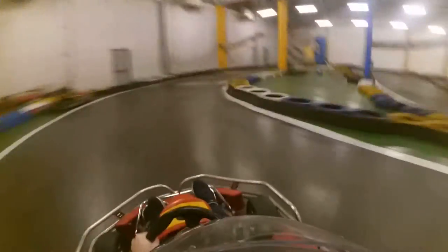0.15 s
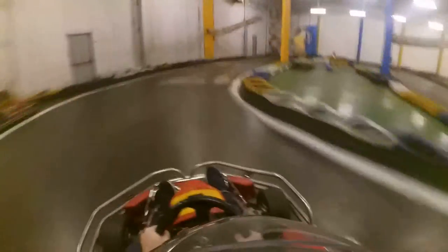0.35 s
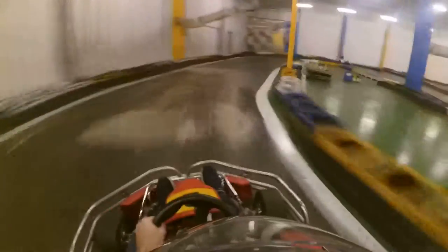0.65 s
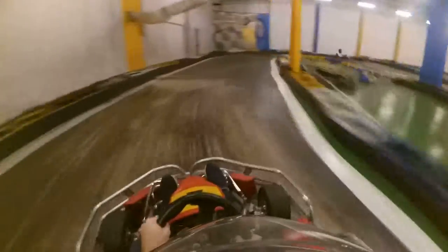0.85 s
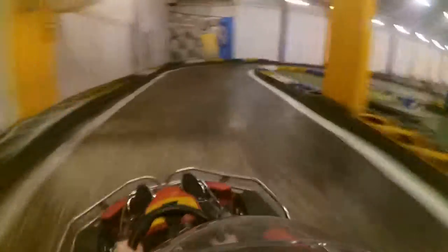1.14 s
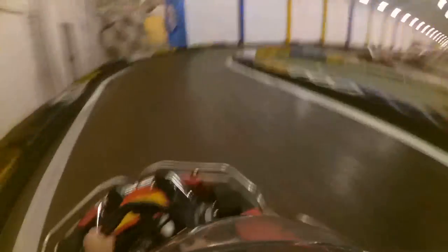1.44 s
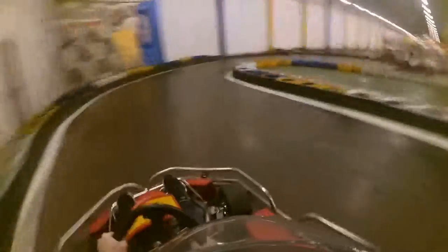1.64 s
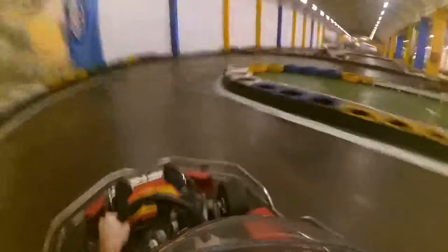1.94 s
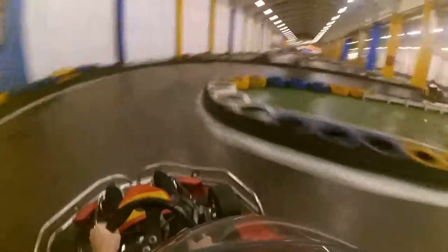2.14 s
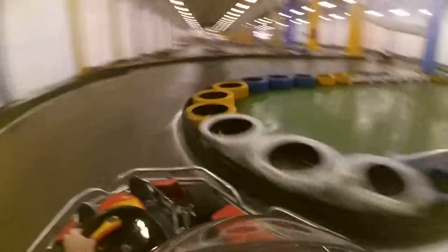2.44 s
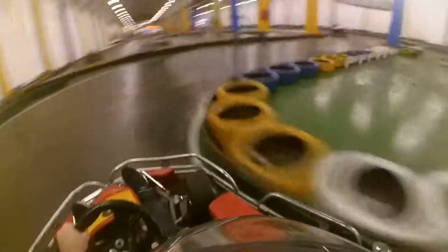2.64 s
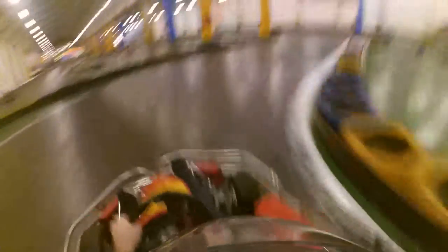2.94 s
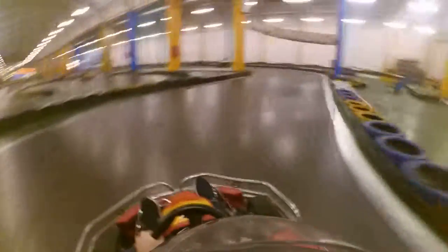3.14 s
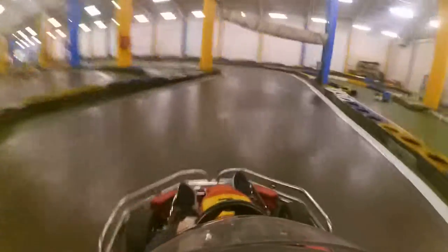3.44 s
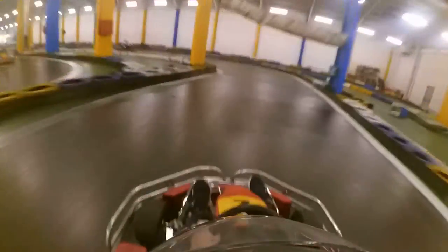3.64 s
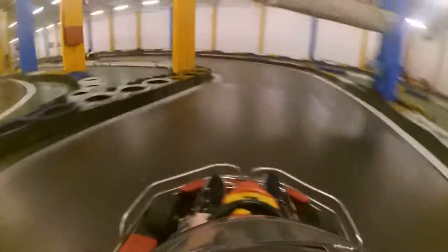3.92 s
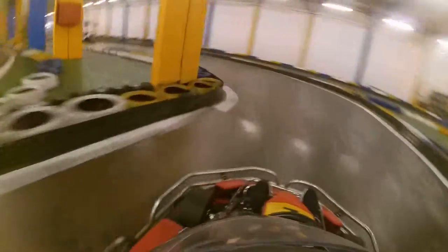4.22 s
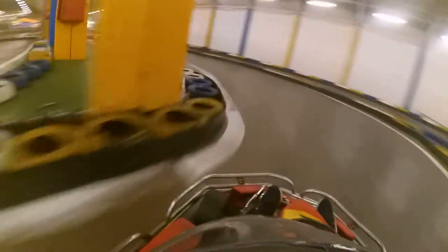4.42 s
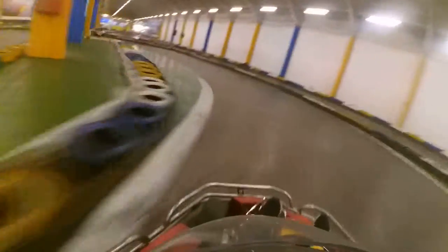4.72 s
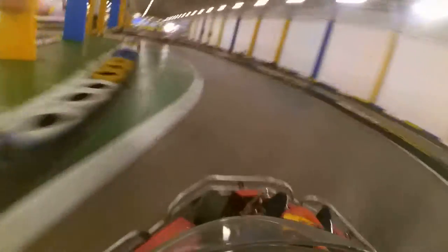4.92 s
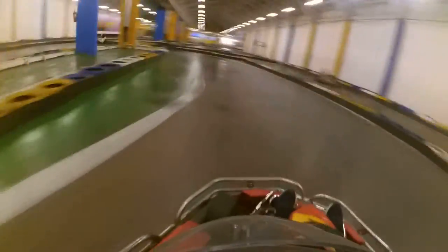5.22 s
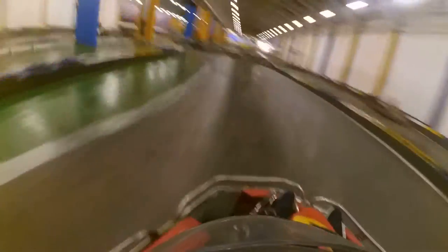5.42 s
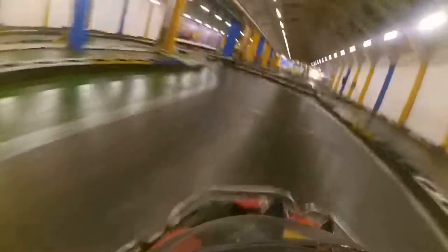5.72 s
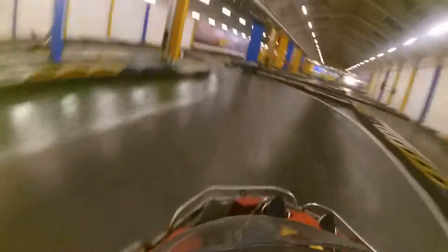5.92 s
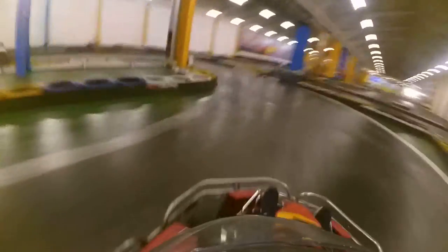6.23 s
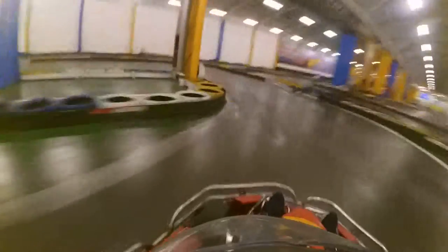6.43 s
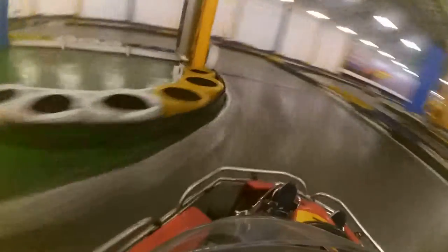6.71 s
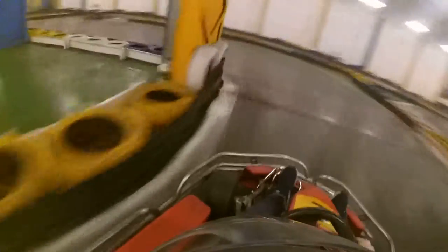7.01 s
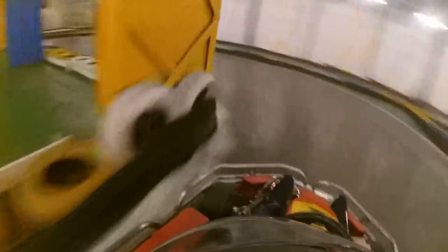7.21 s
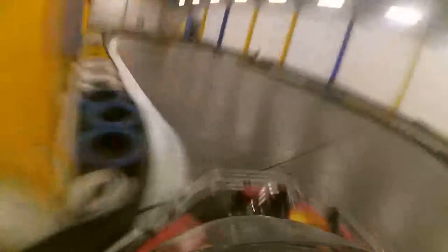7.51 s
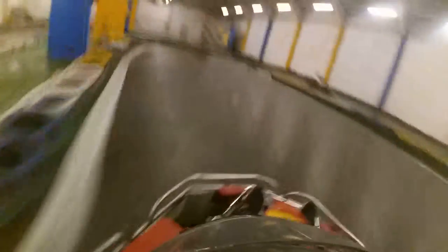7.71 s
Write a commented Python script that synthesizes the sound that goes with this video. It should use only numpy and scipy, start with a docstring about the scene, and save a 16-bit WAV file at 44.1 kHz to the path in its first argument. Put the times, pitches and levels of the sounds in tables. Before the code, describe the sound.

From the helmet of a driver lapping an indoor track, a small go-kart engine pulses with a sharp crackle and metallic clatter. The revs sink into a corner with knocks and short, hoarse tyre squeals, then build gradually with a fluttering chain whine. They fall again for another chirping bend before a last hard burst of throttle. Low wind rumble and soft helmet thuds run underneath.

```python
"""A throbbing, crackling engine pulls hard: a one-cylinder four-stroke go-kart laps an indoor track.
Heard from the driver's helmet, the exhaust pulses and the engine and chain set the metalwork ringing.
With the pedal down, every firing adds a sharp crack. The shaking helmet rumbles in the rushing air,
the frame knocks over bumps, and the tyres scrub and chirp in the tight corners."""
import sys
import numpy as np
from scipy import signal
from scipy.fft import rfft, irfft
from scipy.io import wavfile

SR = 44100
rng = np.random.default_rng(int(sys.argv[2]) if len(sys.argv) > 2 else 0)


def transcribe(u):
    """Save the signal u as a 16-bit wav file named by the first command-line argument.

    u: samples, shape (n,) or (channels, n), limited to [-1, 1]; the rate is SR.
    q: integer samples, one column per channel.
    """
    v = np.clip(np.atleast_2d(u).T, -1, 1)
    q = np.round(v * 32767).astype(np.int16)
    wavfile.write(sys.argv[1], SR, q)


N = 346626
TIME = np.arange(N) / SR
FREQS = np.maximum(np.fft.rfftfreq(N, 1 / SR), .01)


def undb(db):
    """Turn decibels into a gain."""
    return 10 ** (np.asarray(db) / 20)

def level(x, db=0):
    """Scale a signal to an average (rms) level."""
    return x * undb(db) / np.std(x)

def noise():
    """White noise: an even hiss."""
    return rng.standard_normal(N)

def wander(rate):
    """A random drift that heads for a new value rate times a second."""
    count = int(rate * N / SR) + 2
    return level(np.interp(TIME * rate, np.arange(count), rng.standard_normal(8192)[:count]))

def colour(x, points):
    """Give a sound the tone of a (frequency [Hz], level [dB]) table, at an rms level of one."""
    hz, db = np.transpose(points)
    cepstrum = irfft(np.log(undb(np.interp(np.log(FREQS), np.log(hz), db))), N)
    fold = 1 + np.sign(N / 2 - np.arange(N)) * (np.arange(N) > 0)  # ring after a hit, never before
    return level(irfft(rfft(x) * np.exp(rfft(cepstrum * fold)), N))

def ring(strike, tones):
    """Ring each tone of an object with its own signal from strike()."""
    spectrum = 0
    for hz, width, db in tones:
        off_pitch = hz / width * (FREQS / hz - hz / FREQS) / 1.294
        spectrum += undb(db) * rfft(strike()) / (1 + 1j * off_pitch) ** 2
    return level(irfft(spectrum, N))

def grains(spread_db):
    """Tightly packed tiny hits of uneven size."""
    return level(noise() * undb(spread_db * np.minimum(rng.exponential(size=N), 6)))

def taps(rate):
    """Lone hits at random moments, about rate a second."""
    return level((rng.random(N) < rate / SR) * (1 + .5 * rng.exponential(size=N)))

def burst(age, rise_s, decay_s):
    """The shape of a blow: it rises, then dies away."""
    age = np.maximum(age, 0)
    return (1 - np.exp(-age / rise_s)) * np.exp(-age / decay_s)

def hump(s, half_s):
    """A smooth swell around a moment."""
    return np.exp(-((TIME - s) / half_s) ** 2)

def per_firing(cycle, spread_db):
    """A random gain held for each engine cycle."""
    return undb(spread_db * rng.standard_normal(512)[cycle.astype(int)])

def by_speed(firing_hz, cruise_db, octave_db):
    """A level in dB: cruise_db at 24 firings a second, plus octave_db for each doubling."""
    return cruise_db + octave_db * np.log2(firing_hz / 24)


# how fast the engine runs (time [s], firing rate [Hz])
ENGINE_SPEED = [(0, 34.6), (.45, 34.35), (.9, 35.03), (1.5, 28.03), (2, 25.05), (2.45, 22.86),
                (2.95, 24.22), (3.5, 23.78), (4.7, 25.3), (5.2, 26.41), (5.9, 28.67), (6.8, 24.46),
                (7.3, 20.51), (7.55, 21.43), (7.86, 25.63)]

def firings():
    """The firing rate, a running count of engine cycles, and the seconds since the last firing."""
    firing_hz = np.interp(TIME, *np.transpose(ENGINE_SPEED))
    cycle = .37 + np.cumsum(firing_hz) / SR
    return firing_hz, cycle, cycle % 1 / firing_hz

# pushes on the pedal, which add up (start [s], end [s], rise [s], firing force [dB])
PEDAL_PRESSES = [(-.5, 0.938, .05, -10), (2.68, 5.907, 0.033, -10.5), (4.117, 5.903, .3, -8.5),
                 (7.374, 7.9, 0.036, -3.5)]

def pedal():
    """The force of the firings in dB, and the load (0-1) that follows as the chain pulls tight."""
    release_s, lag_s, pedal_up_db, tight_db = 0.029, 0.11, -50, -8
    force = 0
    for start, end, rise, db in PEDAL_PRESSES:
        press = 1 - np.exp(-np.maximum(TIME - start, 0) / rise)
        force += undb(db) * press * np.exp(-np.maximum(TIME - end, 0) / release_s)
    pull = np.tanh(force / undb(tight_db))
    keep = np.exp(-1 / (lag_s * SR))
    load, _ = signal.lfilter([1 - keep], [1, -keep], pull, zi=pull[:1])
    return 20 * np.log10(force + undb(pedal_up_db)), load

# bends (middle [s], half length [s], tyre scrub [dB], frame judder [dB], extra cover shake [dB])
CORNERS = [(.5, 1, -30, -54, 1.5), (2.015, 0.52, -24.5, -41.5, 6.5), (3.067, 0.69, -29.5, -33.5, 4.5),
           (7.7, 0.59, -23, -41, 2.5)]

def cornering():
    """Sideways force swells and fades in each bend, working the tyres, frame and covers."""
    scrub = judder = shake_db = 0
    for middle, half, scrub_db, judder_db, covers_db in CORNERS:
        force = hump(middle, half)
        scrub += force * undb(scrub_db)
        judder += force * undb(judder_db)
        shake_db += force * covers_db
    return scrub, judder, shake_db

# the silencer's throb, loudest where it resonates (crank rate [Hz], level without load [dB])
SILENCER = [(42, -53), (49, -43), (52, -36), (55, -33), (58, -35.5), (70, -40.5)]
# tone of the exhaust pipe (frequency [Hz], relative level [dB])
PIPE_TONE = [(65, 10), (82, 8), (100, -3.5), (130, 2), (170, 5), (215, -0.5), (270, -6), (315, 4), (342, 5),
             (370, -4), (450, -10.5)]

def exhaust(cycle, firing_hz, throttle_db, load):
    """Gas throbs with each crank turn; overtones swell as they pass the pipe's own pitches."""
    phase = 2 * np.pi * cycle  # the crank turns twice per firing
    throb_db = np.interp(2 * firing_hz, *np.transpose(SILENCER)) + 10 * load
    throb = undb(throb_db + 1.3 * wander(11)) * np.cos(2 * phase)
    throb += undb(throttle_db - 35) * np.cos(phase)
    hz, db = np.transpose(PIPE_TONE)
    overtones = 0
    for k in range(3, 18):
        gain = undb(np.interp(np.log(k * firing_hz), np.log(hz), db) + 2 * wander(8))
        smear = k * k + 0.94 * wander(20)  # echoes in the pipe blur the pulses
        overtones += gain * np.cos(k * phase + smear)
    gas_flow = undb(by_speed(firing_hz, cruise_db=0, octave_db=10) + 7.3 * load)
    return np.sqrt(2) * throb + level(overtones * gas_flow, -38)

# ringing of the cylinder head (pitch [Hz], fade time [s], relative level [dB])
HEAD_TONES = [(3370, .0035, -3.5), (5576, 0.0023, 2), (8020, 0.005, -6.5), (10340, 0.002, -4.5),
              (11900, 0.0016, -12)]
# tone of the crack (frequency [Hz], relative level [dB])
CRACK_TONE = [(700, -56), (1400, 3), (2000, -0.5), (4500, 4), (7500, 2), (9000, -2), (13000, -3),
              (15500, -14)]

def combustion(cycle, age, throttle_db):
    """Each firing cracks and rings the cylinder head, then hits again a few milliseconds later."""
    second_age = np.maximum(age - 0.00232 * per_firing(cycle, spread_db=2.5), 0)
    crack = 0
    for since, hit_db in (age, 0), (second_age, -3):
        ping = 0
        for hz, decay, db in HEAD_TONES:
            gain = undb(db) * per_firing(cycle, spread_db=2.5)
            pitch = hz * per_firing(cycle, spread_db=0.25)
            ping += gain * burst(since, rise_s=0.00026, decay_s=decay) * np.sin(2 * np.pi * pitch * since)
        grit = colour(burst(since, rise_s=0.00015, decay_s=0.0018) * noise(), CRACK_TONE)
        crack += undb(hit_db) * per_firing(cycle, spread_db=1) * (level(ping) + level(grit, -2))
    return level(crack, throttle_db - 25.5)

# ringing of the engine casing and its thin covers (pitch [Hz], width [Hz], relative level [dB])
CASING_TONES = [(1177, 130, -3.5), (1404, 296, -2), (1548, 215, -6), (1768, 194, -7), (2200, 260, -11)]
COVER_TONES = [(3435, 180, 0), (3630, 164, -5), (3943, 600, -7), (5130, 350, -17.5), (6560, 1830, -25)]
# tone of the casing's broad noise and of the bright rattle (frequency [Hz], relative level [dB])
WASH_TONE = [(300, -46), (480, -6.5), (620, -1), (850, 0), (1200, 4.5), (2000, -7.5), (2800, 0.5),
             (4500, -10), (8000, -65)]
RATTLE_TONE = [(2000, -12), (4500, 10.5), (5300, 18.5), (7300, 9.5), (8050, 13), (8600, -1.5), (10500, 3),
               (11800, 0), (13200, -12), (15500, -17)]

def clatter(age, firing_hz, load, shake_db):
    """Piston, valves and chain shake the metalwork, harder with speed, load and sideways force."""
    casing_db = by_speed(firing_hz, cruise_db=-28, octave_db=7.5) + 4 * load
    covers_db = by_speed(firing_hz, cruise_db=-29.5, octave_db=7) + 2.1 * load + shake_db
    rattle_db = by_speed(firing_hz, cruise_db=-37.5, octave_db=5.5) + 6 * load + 0.16 * shake_db
    slap = (0.68 + 0.66 * load) * burst(age - .002, rise_s=0.002, decay_s=0.0029)
    shaking = (1 + 1.36 * slap) * undb(0.51 * wander(90))  # hardest just after each firing
    casing = ring(lambda: shaking * (grains(spread_db=2.5) + 0.48 * taps(rate=45)), CASING_TONES)
    casing += undb(-6.5) * colour(shaking * grains(spread_db=3), WASH_TONE)
    clinks = 0.38 * taps(rate=40)  # the covers hit their mounts
    covers = ring(lambda: shaking * (grains(spread_db=4.5) + clinks), COVER_TONES)
    covers *= undb(0.5 * wander(25))
    chain_tugs = 0.17 * load * taps(rate=93)
    rattle = colour(undb(1.3 * wander(300)) * shaking * (grains(spread_db=2.5) + chain_tugs), RATTLE_TONE)
    return level(casing, casing_db) + level(covers, covers_db) + level(rattle, rattle_db)

# whines (start [s], end [s], pitch [times the firing rate], top level at full load [dB], flutter [1/s])
WHINES = [(-.4, 1.3, 16.9, -37.5, 45), (-.4, 1.5, 26.6, -31, 107), (3.45, 4.58, 47.8, -27, 100),
          (4.5, 6.8, 28, -38, 91)]

def singing(cycle, load):
    """The intake hums at first, and later chain and gears sing, in hoarse, fluttering swells, quieter when the
    chain goes slack."""
    whine = 0
    for start, end, multiple, db, flutter in WHINES:
        swell = np.clip(4 * (TIME - start) * (end - TIME) / (end - start) ** 2, 0, 1)
        phase = 2 * np.pi * multiple * cycle
        whine += swell * level(wander(flutter) * np.cos(phase) + wander(flutter) * np.sin(phase), db)
    return whine * undb(-5 * (1 - load))

# tone of sliding rubber (frequency [Hz], relative level [dB])
SCRUB_TONE = [(2400, -10.5), (3100, 2.5), (3600, 6.5), (4600, -10), (5500, -2.5), (6350, 3), (7300, -6),
              (8800, -14), (15000, -24.5)]

def tyre_scrub(scrub):
    """Rubber judders across the smooth floor in the corners, and faintly on the straights."""
    straight_db = -50.5
    rubbing = grains(spread_db=-0.5) * undb(2 * wander(70))
    return (scrub + undb(straight_db)) * colour(rubbing, SCRUB_TONE)

# deep ringing of the frame (pitch [Hz], width [Hz], relative level [dB])
BOOM_TONES = [(56, 22, -3), (98.7, 11, -5)]
# tone of the wheels' rumble (frequency [Hz], relative level [dB])
RUMBLE_TONE = [(40, 1), (60, 9), (120, -6.5), (215, 2), (290, -1.5), (345, -1.5), (385, -13.5),
               (480, -12.5), (800, -28)]

def rolling(firing_hz, judder):
    """The wheels rumble through the frame, which booms with speed and judders in the corners."""
    boom_gain = undb(by_speed(firing_hz, cruise_db=-44, octave_db=23.5)) + judder
    boom = boom_gain * ring(noise, BOOM_TONES)
    rumble = colour(noise() * undb(2.1 * wander(25)), RUMBLE_TONE)
    return boom + level(rumble, -40)

# tone of the swaying head and of the air beating on the helmet (frequency [Hz], relative level [dB])
SWAY_TONE = [(2, -28), (5, -10.5), (8, 3.5), (12, -5.5), (17, -9), (60, -71.5), (1000, -130)]
WIND_TONE = [(8, -13.5), (18, 10.5), (28, 2), (45, -3), (80, -12), (200, -31.5), (3000, -120)]
# thuds of the helmet (time [s], relative level [dB])
HELMET_THUDS = [(0, -17), (0.191, -11.5), (.6, -18.5), (0.978, -15), (1.111, -15), (1.22, -22),
                (1.381, -20), (1.639, -4), (3.05, -9.5), (3.78, -23), (4.68, -33), (5.835, -9),
                (6.053, -7.5), (7.011, -15), (7.511, -9)]

def helmet(firing_hz):
    """The helmet sways in the wind; each thud rocks it, shoves it and adds a puff of air."""
    sway = signal.hilbert(colour(noise(), SWAY_TONE))
    rocking = level(sway.real / np.sqrt(np.abs(sway) ** 2 + .5))  # evens out the size of the swings
    wind = undb(by_speed(firing_hz, cruise_db=-36, octave_db=14))
    swing, shoves = undb(-20), 0
    for s, db in HELMET_THUDS:
        age = TIME - s
        swing += undb(db - 7) * hump(s, half_s=0.13)
        wind += undb(db) * burst(age, rise_s=0.039, decay_s=0.035)
        shoves += undb(db + 9) * burst(age, rise_s=0.0056, decay_s=0.04) * np.sin(2 * np.pi * 14 * age)
    motion = swing * rocking + wind * colour(noise(), WIND_TONE) + shoves
    return .7 * np.tanh(motion / .7)  # rounds off the biggest peaks

# bumps (time [s], strength in the covers [dB], strength in the casing [dB], fade time [s])
BUMPS = [(.772, -14, -17, 0.0092), (1.372, -13, -23, 0.013), (1.47, -11, -13.5, 0.029),
         (1.625, -9.5, -26, .013), (1.707, -9.5, -23, 0.027), (1.762, -15, -19, 0.011),
         (2.402, -10.5, -25, .007), (2.67, -14.5, -16.5, 0.0066), (2.781, -16, -14, 0.0058),
         (2.814, -13, -15, 0.0058), (2.855, -14, -17, .007), (3.356, -11, -25, 0.0066),
         (6.055, -30, -19, .007), (7.3, -22, -16, 0.029)]

def knocks():
    """Bumps jolt the covers and the casing; the longer a jolt, the softer it starts."""
    covers = casing = 0
    for s, covers_db, casing_db, decay in BUMPS:
        jolt = burst(TIME - s, rise_s=0.0016 * (decay / 0.009) ** 1.7, decay_s=decay)
        covers += undb(covers_db) * jolt
        casing += undb(casing_db) * jolt
    return covers * ring(noise, COVER_TONES) + casing * ring(noise, CASING_TONES)

# squeals of the tyres (time [s], half length [s], pitch [Hz], level [dB])
TYRE_CHIRPS = [(1.774, 0.11, 6430, -29), (1.886, 0.087, 3550, -20.5), (1.98, 0.076, 5460, -27),
               (2.077, 0.024, 6290, -28), (2.103, 0.035, 7280, -34), (2.3, 0.14, 6100, -33),
               (3.008, .02, 7000, -28), (3.284, .012, 6860, -25), (7.45, 0.29, 6240, -31.5)]

def tyre_chirps():
    """In the corners the sliding rubber breaks into short, hoarse chirps."""
    chirps = 0
    for s, half, hz, db in TYRE_CHIRPS:
        pitch = hz * (1 + 0.012 * wander(25) + 0.022 * wander(900))
        squeal = np.sin(2 * np.pi * np.cumsum(pitch) / SR) * undb(3.1 * wander(80))
        chirps += hump(s, half) * level(squeal, db)
    return chirps


def scene():
    """Add up the sounds of the kart, the same in both ears."""
    firing_hz, cycle, age = firings()
    throttle_db, load = pedal()
    scrub, judder, shake_db = cornering()
    engine = exhaust(cycle, firing_hz, throttle_db, load) + combustion(cycle, age, throttle_db)
    metalwork = clatter(age, firing_hz, load, shake_db) + singing(cycle, load) + knocks()
    tyres = tyre_scrub(scrub) + tyre_chirps()
    mono = engine + metalwork + tyres + rolling(firing_hz, judder) + helmet(firing_hz)
    return np.array([mono, mono])

def record(dry):
    """Flatten any peaks past full scale and cut the treble above 15250 Hz."""
    treble_cut = signal.ellip(10, .2, 90, 15250, fs=SR, output="sos")
    return signal.sosfilt(treble_cut, np.clip(dry, -1, 1))


dry = scene()
out = record(dry)
transcribe(out)
```